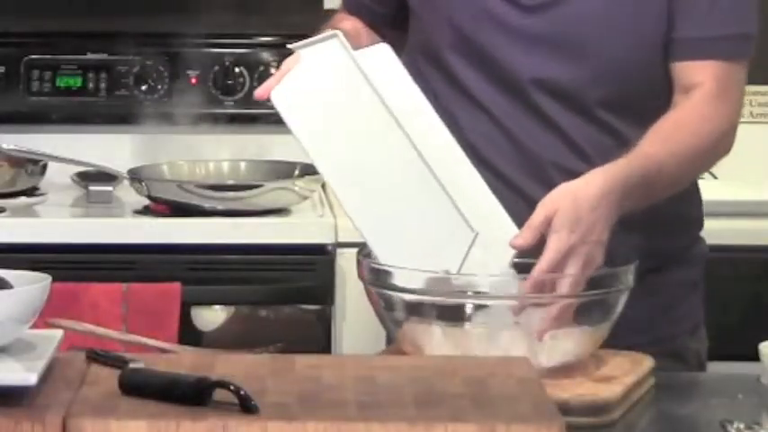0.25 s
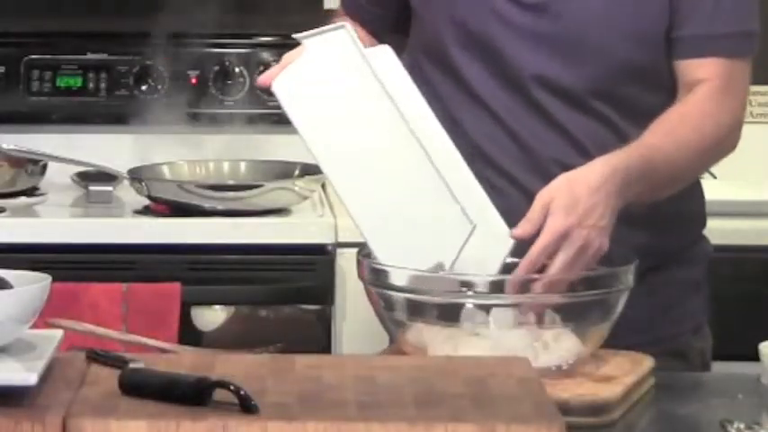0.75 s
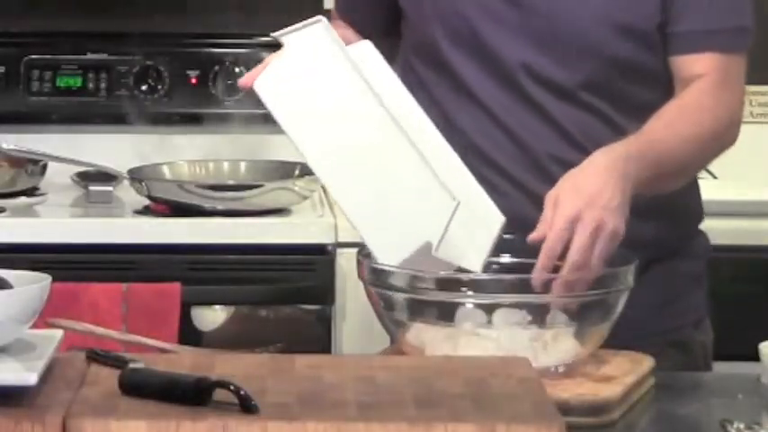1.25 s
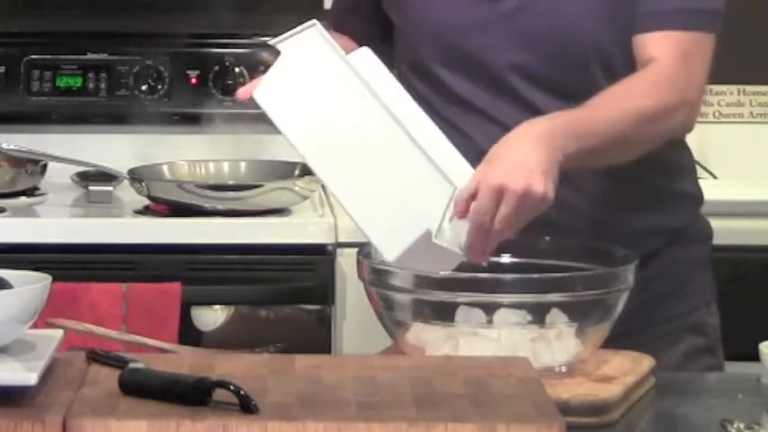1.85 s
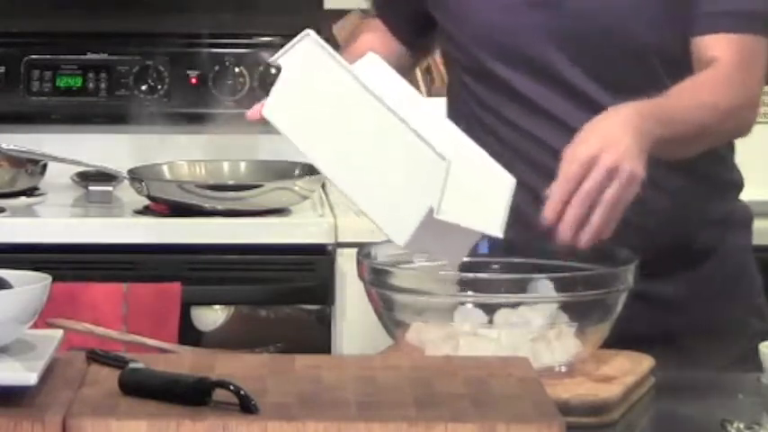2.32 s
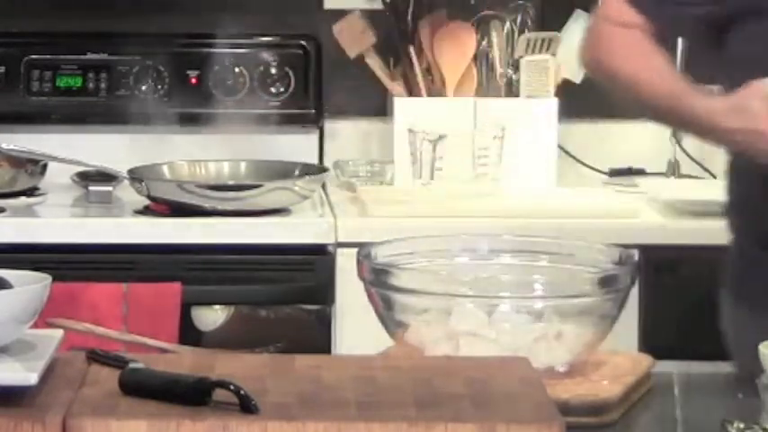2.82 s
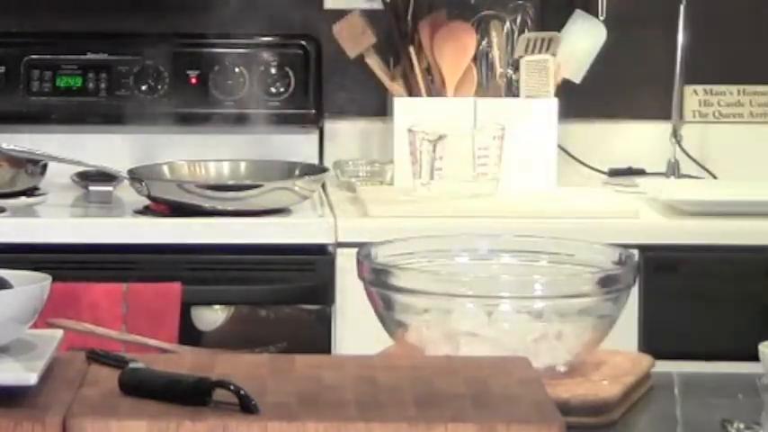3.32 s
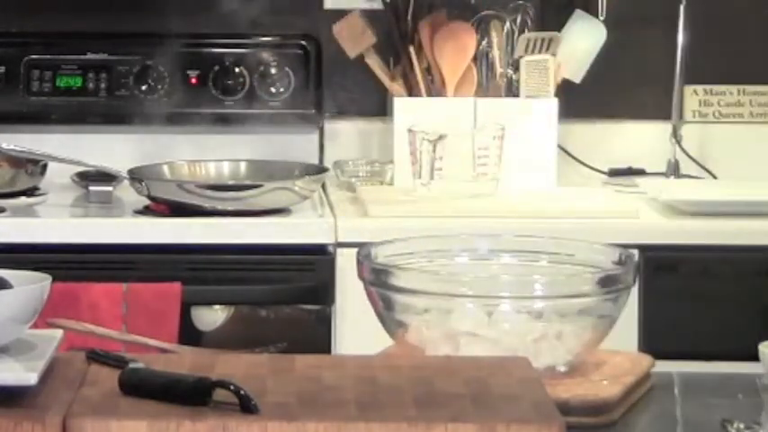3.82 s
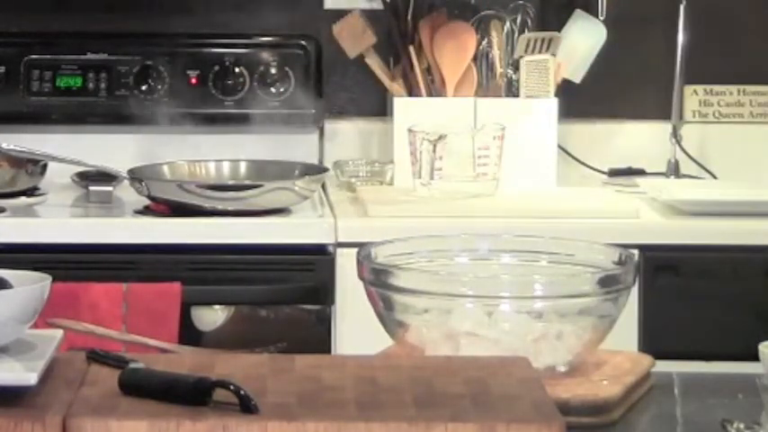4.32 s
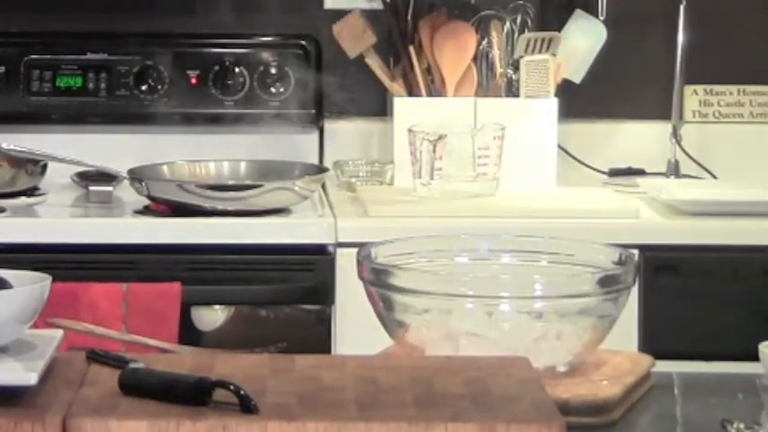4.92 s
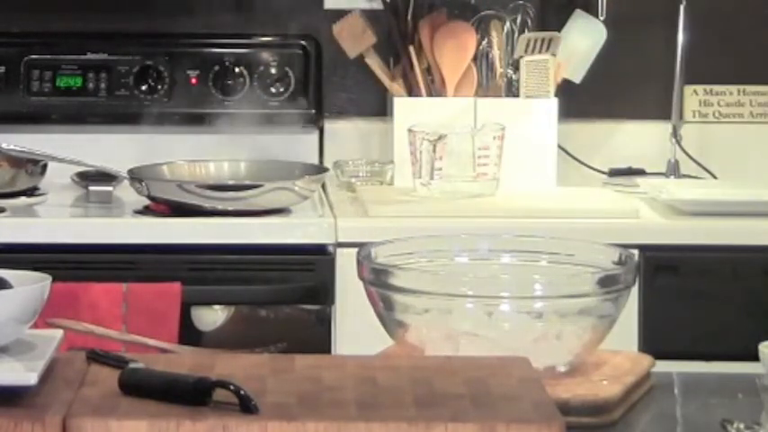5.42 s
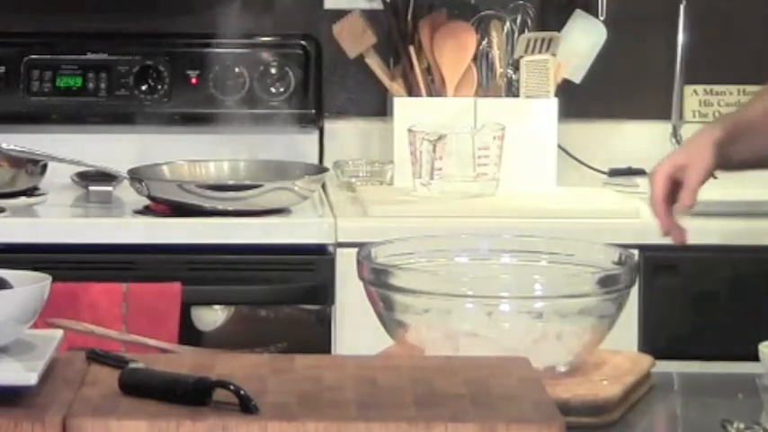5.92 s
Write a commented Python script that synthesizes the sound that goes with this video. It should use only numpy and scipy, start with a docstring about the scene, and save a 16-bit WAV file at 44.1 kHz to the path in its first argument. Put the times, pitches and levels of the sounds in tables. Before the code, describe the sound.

Ice cubes drop quickly into a glass bowl with bright, short clinks, while the remaining cubes slide and knock inside a hollow plastic bin. The knocks thin out as the bin is carried away. Then it is shoved in jerks along a shelf, scraping, groaning and thudding, before a quiet gap and one last small knock. A small hard kitchen, close stereo microphone, with steady appliance hum and faint hiss.

```python
"""In a small hard kitchen, ice cubes tumble from a plastic bin into a glass bowl, which rings in damped modes.
The cubes left slide and knock in the bin: dense random impacts filtered by its resonances.
The bin is then pushed in jerks along a shelf, which scrapes, groans at narrow pitches and thumps low.
Sparse decaying reflections return all of this except the thumps;
shaped noise gives the hum of appliances and the hiss of the microphone."""
import sys
import numpy as np
from scipy import signal
from scipy.fft import rfft, irfft
from scipy.io import wavfile
from scipy.ndimage import uniform_filter1d

SR = 44100
rng = np.random.default_rng(int(sys.argv[2]) if len(sys.argv) > 2 else 0)


def output_pcm(signal):
    """Save a mono or channel-first signal as 16-bit PCM at the path in sys.argv[1].

    Samples are clipped to [-1, 1] before scaling.
    """
    pcm = np.clip(np.atleast_2d(signal).T, -1, 1) * 32767
    wavfile.write(sys.argv[1], SR, np.round(pcm).astype(np.int16))


N = 271656


def gain_of(db):
    """Decibel law: 20 dB is a tenfold amplitude."""
    return 10 ** (np.asarray(db) / 20)


def evened(x):
    """Normalisation to unit rms."""
    return x / np.sqrt(np.mean(x ** 2) + 1e-20)


def read(points, hz):
    """Interpolation of a spectrum along logarithmic frequency."""
    f, value = np.transpose(points)
    return np.interp(np.log(hz + 1), np.log(f + 1), value)


def add(mix, s, sound):
    """Superposition of a sound on the mix from time s."""
    part = mix[round(s * SR):][:len(sound)]
    part += sound[:len(part)]


def coloured(x, db):
    """Minimum-phase filtering: the gain db on a 4096-point spectrum fixes the causal response."""
    log_gain = np.log(gain_of(np.maximum(db, -100)))
    circle = np.r_[log_gain, log_gain[-2:0:-1]]
    taps = np.fft.ifft(np.exp(np.conj(signal.hilbert(circle)))).real
    return signal.oaconvolve(x, taps)[:len(x)]


def clicks(count, per_s, spread_db):
    """Random impulse train: impacts of either sign, a few much larger than the rest."""
    size = gain_of(spread_db * np.minimum(rng.exponential(1, count), 4))
    sign = rng.choice([-1., 1.], count)
    return size * sign * (rng.random(count) < per_s / SR)


def bowl():
    """Modal synthesis: every blow ticks and rings the glass modes, each as strongly as its place allows."""
    # cubes striking the bowl: (time [s], blow [dB], hardness = upper modes and tick against the blow [dB])
    clinks = [(0.0044, -10, -32), (0.0408, -3.5, -31), (0.1114, -8, -23), (0.225, -6.5, -2),
              (0.2728, -11.5, 0), (0.2944, -24, -19), (0.3285, 1, -26), (0.3444, -24, -40),
              (0.3674, -9, -3), (0.4985, -12, -9.5), (0.5676, -16.5, -6.5)]
    # modes of the glass bowl, damped by the ice in it: (frequency [Hz], level [dB], t60 [s])
    modes = [(2003, -14, .2), (2040, -13, .2), (2108, -6, .15), (2143, 1.5, .18), (3470, -6, .16),
             (3521, -10, .18), (3568, -5, .16), (5215, -4.5, .15), (5615, -9, .1), (5850, -8, .09),
             (6045, -7, .1), (6503, -9, .07), (6708, -6, .1), (7375, -8, .07), (7615, -4, .1),
             (8419, -10, .07), (8522, -8, .09), (9125, -11, .07), (9830, -15, .06), (10600, -18, .05),
             (11670, -16, .05)]
    # cubes jostling inside the bowl: (time [s], level [dB])
    jostle_levels = [(0, -13.5), (.2, -24.5), (.3, -13.5), (.45, -28), (.6, -48), (.68, -72)]
    wander_hz = 15  # cubes shifting on the glass blur each mode by this much
    t, out = np.arange(SR // 3) / SR, np.zeros(N)
    hz, db, t60 = np.transpose(modes)[:, :, None]
    fall = gain_of(db - 60 * t / np.maximum(t60, .02))
    upper = hz > 4500
    places = rng.standard_normal((len(clinks), 2, len(modes), 1))
    ticks = rng.standard_normal((len(clinks), len(t)))
    for (s, blow_db, hard_db), (place, load), tick in zip(clinks, places, ticks):
        # a random walk of phase broadens each mode
        walk = np.cumsum(rng.standard_normal(fall.shape), axis=1)
        wander = uniform_filter1d(walk, size=64) * np.sqrt(2 * np.pi * wander_hz / SR)
        # cubes resting on the glass detune each mode a little
        detuned_hz = hz * (1 + 0.003 * load)
        rings = fall * np.sin(2 * np.pi * detuned_hz * t + 3 * place + wander)
        strengths = gain_of(upper * hard_db + 1.8 * place)
        ring = (strengths * rings).sum(0) * np.minimum(t / .004, 1)
        tick = np.diff(uniform_filter1d(tick, size=6), prepend=0)
        tick = tick * np.exp(-t / 0.012) * np.minimum(t / .003, 1) * gain_of(hard_db - 10)
        add(out, s, gain_of(blow_db) * (ring + tick))
    level = gain_of(np.interp(np.arange(SR) / SR, *np.transpose(jostle_levels)))
    rings = fall * gain_of(-3.5 * upper) * np.sin(2 * np.pi * hz * t)
    jostle = sum(signal.oaconvolve(clicks(SR, 450, 1.8), ring)[:SR] for ring in rings)
    # ice on ice, between the modes
    grit = signal.lfilter(*signal.iirpeak(5000, .9, fs=SR), clicks(SR, 5000, 2.5))
    add(out, 0, level * (evened(jostle) + gain_of(-17) * evened(grit)))
    return out


def knocks():
    """Impact excitation: brief contacts ring a hollow tone and a broad crack at its own, usually higher, pitch."""
    # single knocks of cube, bin and shelf: (time [s], blow [dB], pitch [Hz],
    # hollowness = pitch / width [ratio], crack pitch [Hz], crack against the blow [dB])
    blows = [(0.641, -11, 990, 1.6, 2200, -3), (0.883, -14.5, 3370, 0.89, 1210, -6),
             (0.983, -14.5, 776, 3.4, 2600, -14), (1.046, -8, 1200, 0.45, 6200, -19),
             (1.172, -22, 755, 3.4, 5640, 2.5), (1.21, -15, 695, 3.5, 3160, -4.5),
             (1.36, -18, 1880, 1.7, 3460, -6), (1.438, -16.5, 610, 1.6, 2800, -12),
             (1.518, -14, 856, 4.5, 2900, -5), (1.538, -3.5, 1310, 0.71, 4700, -30),
             (1.624, -16, 790, 2.7, 2480, -1.5), (1.689, -14, 764, 0.41, 2410, -4.5),
             (1.819, -20, 437, 2.3, 2560, -8), (1.892, -16, 890, 0.79, 3370, -30),
             (2.054, -19, 500, 0.52, 2500, -18), (2.174, -21, 715, 1.35, 1950, 2.5),
             (2.184, -22, 510, 3, 1600, -8), (2.279, -12.5, 1580, 2.7, 2640, -4),
             (2.286, -15.5, 675, 1.6, 1520, -23), (2.428, -13, 1790, 4.3, 3700, -3.5),
             (2.449, -38, 1720, 3.5, 3870, -22), (2.501, -17.5, 3700, 2.2, 3080, -1),
             (2.511, -14.5, 3400, 4.7, 5300, -22), (2.522, -31, 3430, 4.7, 2800, -21),
             (2.671, -29.5, 1720, 3, 3350, 0), (2.846, -22, 723, 6.8, 1990, -1),
             (2.883, -10.5, 766, 2.4, 2100, -6), (3.11, -36, 513, 17, 2840, -6.5),
             (3.448, -19.5, 1000, 2.5, 1420, -3), (3.454, -20.5, 1030, 2.1, 1490, -5),
             (3.491, -14.5, 402, 1.45, 1500, -6), (3.497, -17, 3770, 4.5, 1480, 2),
             (3.628, -8.5, 803, 3.6, 2630, -10.5), (3.674, -14.5, 840, 3.2, 1400, 0),
             (3.756, -5.5, 774, 0.78, 2030, -10), (3.782, -8.5, 670, 6.2, 2680, -5),
             (3.791, -8.5, 680, 2.8, 1880, -2), (3.878, -8.5, 700, 3.2, 1500, -3),
             (3.983, -6, 690, 2.3, 1740, 0.5), (4.035, -11.5, 680, 1.4, 1690, -2.5),
             (4.075, -8.5, 732, 5.7, 2320, -3.5), (4.131, -21, 764, 2.5, 1900, 7),
             (4.331, -6.5, 684, 1.5, 3020, -4.5), (4.54, -17, 970, 0.52, 3300, 7.5),
             (4.714, -14, 830, 3.4, 2510, 5.5), (4.888, -7.5, 660, 0.41, 2670, -23),
             (5.072, -9.5, 1180, 5, 2920, -3.5), (5.151, -6, 740, 0.92, 2600, -11),
             (6.004, -24.5, 1100, 2, 2670, 2.5), (6.067, -21, 1000, 1.8, 1580, -5),
             (6.113, -22, 2760, 1.7, 3380, -13), (6.117, -9, 3000, 2.6, 2470, -4),
             (6.127, -22, 2200, 2.4, 3230, -13)]
    rise_s = .0017  # a cube lands edge first, so the blow builds up
    decay_s = 0.0041  # time constant of the contacts
    out, t = np.zeros(N), np.arange(4000) / SR
    noise = rng.standard_normal((len(blows), 2, len(t)))
    noise[:, 0, round(rise_s * SR)] = 2.7  # the hardest contact
    for (s, blow_db, hz, hollow, crack_hz, crack_db), contacts in zip(blows, noise):
        slow = t / [[1], [2]]  # the chips behind the crack spread over twice the time
        struck, chips = contacts * np.exp(-slow / decay_s) * np.minimum(slow / rise_s, 1)
        cavity = signal.iirpeak(hz, np.clip(hollow, .5, 12), fs=SR)
        edge = signal.iirpeak(crack_hz, 1.3, fs=SR)
        tone = signal.lfilter(*cavity, signal.lfilter(*cavity, struck))
        crack = signal.lfilter(*edge, signal.lfilter(*edge, chips))
        knock = tone / abs(tone).max() + gain_of(crack_db) * crack / abs(crack).max()
        add(out, s - rise_s, gain_of(blow_db) * knock)
    return out


def impacts(per_s, spread_db, cycles, ring_db):
    """Granular excitation: each bump gives a short scratch and a brief tone at one of 24 pitches."""
    out, t = np.zeros(N), np.arange(2048) / SR
    scratches = rng.standard_normal((24, len(t))) * np.exp(-t / .003)
    pitches = np.geomspace(300, 5500, num=24) * rng.uniform(0.92, 1.047, 24)
    for hz, scratch in zip(pitches, scratches):
        # the tone falls to 1/e in the given number of cycles
        tone = gain_of(ring_db) * hz / SR * np.sin(2 * np.pi * hz * t) * np.exp(-t * hz / cycles)
        grain = tone + scratch / np.linalg.norm(scratch) / 24
        out += signal.oaconvolve(clicks(N, per_s / 24, spread_db), grain)[:N]
    return out


def lumps(per_s, depth_db):
    """Stick-slip modulation: a gain that jumps about as friction grips and lets go."""
    return gain_of(depth_db * evened(uniform_filter1d(rng.standard_normal(N), round(SR / per_s))))


def rattle(body, modes, drive):
    """Source-filter principle: dense impacts excite a body; gives middle, bass and treble, each of rms 1."""
    hz = np.fft.rfftfreq(4096, 1 / SR)
    resonances_db = sum(db / (1 + (2 * (hz - f) / width) ** 2) for f, width, db in modes)
    colour_db = read(body, hz) + resonances_db
    under_low, under_high = 1 / (1 + (hz / 300) ** 6), 1 / (1 + (hz / 2500) ** 6)
    middle = under_high - under_low
    bass = under_low / (1 + (125 / (hz + 1)) ** 8)
    treble = 1 - under_high
    # the body spectrum is that of the whole rattle, so the slope of the impacts is taken out
    drive_power = signal.welch(drive, nperseg=4096)[1]
    colour_db -= 10 * np.log10(uniform_filter1d(drive_power, size=41))
    colour_db -= colour_db.max()
    shares = middle, bass, treble
    return [evened(coloured(drive, colour_db + 10 * np.log10(share + 1e-9))) for share in shares]


def in_hand(middle, bass, grit):
    """Amplitude envelopes by band: cubes left in the bin rattle as it is tipped and carried off."""
    # cubes sliding and rattling in the hand-held bin: (time [s], level [dB])
    levels = [(0, -10), (.1, -14.5), (.2, -21), (.3, -26), (.62, -25), (.93, -24.5), (1.03, -17.5),
              (1.2, -18.5), (1.29, -28.5), (1.43, -26), (1.5, -15.5), (1.545, -9.5), (1.68, -19),
              (1.8, -30.5), (2.1, -34), (2.4, -52), (2.7, -44), (2.82, -35), (2.89, -16.5), (2.97, -38.5),
              (3.25, -48)]
    # bass of the rattle: (time [s], level [dB])
    bass_levels = [(0, -33.5), (.25, -44), (.65, -43), (.95, -47), (1.1, -73), (1.43, -41), (1.7, -32.5),
                   (2, -77), (2.9, -57.5), (3.25, -66)]
    # treble of the rattle: (time [s], level against the middle [dB])
    grit_levels = [(0, -7), (.3, 6), (.6, 1), (.7, -5.5), (1.2, -3.5), (1.7, -10.5), (2.6, 1.5), (2.9, -10),
                   (3.25, 2)]
    t = np.arange(N) / SR
    level = gain_of(np.interp(t, *np.transpose(levels), right=-120))
    weight = gain_of(np.interp(t, *np.transpose(bass_levels), right=-120))
    grit_share = gain_of(np.interp(t, *np.transpose(grit_levels)))
    return level * (middle + grit_share * grit) + weight * bass


def jerks(rows, middle, bass, grit):
    """Incoherent power addition: each jerk catches, sags or swells, then dies; overlapping powers add."""
    grab_s, release_db_per_s = 0.0039, 153  # it catches quickly and dies when the motion stops
    t, power = np.arange(SR) / SR, np.zeros((3, N))
    for s, level_db, length, sag_db_per_s, weight_db, grit_db in rows:
        sag_db = sag_db_per_s * np.minimum(t, length)
        release_db = release_db_per_s * np.maximum(t - length, 0)
        jerk = np.minimum(t / grab_s, 1) * gain_of(level_db - sag_db - release_db)
        for band, share_db in zip(power, (0, weight_db, grit_db)):
            add(band, s, (gain_of(share_db) * jerk) ** 2)
    return (np.sqrt(power) * [middle, bass, grit]).sum(0)


def groans():
    """Narrow-band resonance: uneven slips ring one tone that fades in and out."""
    # the shelf groaning under the longer jerks: (start [s], length [s], level [dB], pitch [Hz])
    rows = [(3.769, 0.23, -31, 346), (4.0, 0.14, -27, 482), (4.558, 0.051, -25, 306),
            (5.1, 0.185, -25, 453), (5.157, 0.11, -22.5, 322)]
    width_hz, fade_s = 30, 0.02
    out, t = np.zeros(N), np.arange(SR // 2) / SR
    for (s, length, db, hz), noise in zip(rows, rng.standard_normal((len(rows), len(t)))):
        tone = evened(signal.lfilter(*signal.iirpeak(hz, hz / width_hz, fs=SR), noise))
        fade = np.clip(np.minimum(t, length + fade_s - t) / fade_s, 0, 1)
        add(out, s, gain_of(db) * fade * tone)
    return out


def brushes():
    """Band-passed random grains: a short swell of grainy hiss around one broad pitch."""
    # soft bright brushes as the bin is handled: (time [s], level [dB], pitch [Hz])
    rows = [(1.332, -40.5, 8500), (1.46, -35.5, 8000), (1.533, -27, 9200), (1.794, -42, 7500),
            (2.808, -30.5, 7600), (3.13, -33.5, 7660)]
    rise_s, fall_s = 0.007, 0.034  # linear rise; time constant of the fall
    out, t = np.zeros(N), np.arange(SR // 4) / SR
    for (s, db, hz), noise in zip(rows, rng.standard_normal((len(rows), len(t)))):
        band = signal.iirpeak(hz, 1.4, fs=SR)
        grains = noise * clicks(len(t), 4800, 1.7)
        hiss = evened(signal.lfilter(*band, signal.lfilter(*band, grains)))
        swell = np.minimum(t / rise_s, 1) * np.exp(-t / fall_s)
        add(out, s, gain_of(db) * swell * hiss)
    return out


def thumps():
    """Damped oscillation: each jolt rings one low tone that dies exponentially."""
    # low booms under the heavier jolts: (time [s], level [dB], pitch [Hz])
    rows = [(1.017, -34, 142), (1.212, -31, 146), (1.689, -37, 143.5), (1.77, -30, 143),
            (3.491, -32, 162.4), (4.324, -18, 152.3), (4.532, -16, 157.7), (4.598, -16.5, 156.3),
            (4.85, -30, 158.6), (5.072, -28, 148), (6.112, -31, 61.6)]
    rise_s, t60_s = 0.011, 0.49
    out, t = np.zeros(N), np.arange(SR // 2) / SR
    for s, db, hz in rows:
        envelope = np.minimum(t / rise_s, 1) * gain_of(db - 60 * t / t60_s)
        add(out, s, envelope * np.sin(2 * np.pi * hz * t))
    return out


def kitchen(x, apart_db):
    """Reverberation: sparse reflections of random sign die by band, nearly alike at two close microphones."""
    # decay of the room: (frequency [Hz], t60 [s])
    decay = [(150, 0.34), (400, 0.67), (1000, 0.46), (2800, 0.4), (7300, 0.39), (13000, 0.42)]
    # three sets of reflections take turns, so no fixed comb colours the room
    out, turn = np.zeros((2, N)), 2 * np.pi * 0.8966 * np.arange(N) / SR
    for k in range(3):
        taps = np.zeros((2, SR))
        # one reflection at a random place in every 20 samples
        at = np.arange(200, SR - 20, 20) + rng.integers(0, 20, (2, (SR - 201) // 20))
        np.put_along_axis(taps, at, rng.choice([-1., 1.], at.shape), 1)
        hz, t, z = signal.stft(taps, SR, nperseg=256)
        z[1] *= gain_of(apart_db + 1.8 * np.log2(hz / 1000 + 0.067))[:, None]
        fall = gain_of(-60 * t / read(decay, hz)[:, None])
        mid, side = signal.istft(z * fall, SR, nperseg=256)[1]
        tail = np.array([mid + side, mid - side]) / np.linalg.norm(mid)
        share = np.sqrt(2 / 3) * np.cos(turn + 2 * np.pi * k / 3)  # the three powers sum to one
        out += signal.fftconvolve((share * x)[None], tail, axes=1)[:, :N]
    return out


def hum():
    """Spectral shaping of partly coherent noise: steady, alike in both channels in the bass, fluttering a little."""
    # spectrum of the appliances and hiss: (frequency [Hz], relative level per Hz [dB])
    spectrum = [(25, -42), (49, -18), (69, -5.5), (118, -20), (167, 0.5), (201, -12), (249, 0), (372, -8.5),
                (410, -6), (950, -11.5), (1340, -15.5), (14900, -38.5)]
    # left-right likeness: (frequency [Hz], correlation [0 to 1])
    likeness = [(60, 1), (240, 0.94), (930, 0.83), (3660, 0.92), (14400, 0.86)]
    frames, hz = N // 512 + 5, np.fft.rfftfreq(2048, 1 / SR)
    a, b, c, d, patches = rng.standard_normal((frames, 1025, 5)).T
    patches = uniform_filter1d(patches, size=16, axis=0)
    patches = evened(uniform_filter1d(patches, size=8, axis=1))
    same = np.clip(read(likeness, hz), -1, 1)[:, None]
    left = a + 1j * b
    right = same * left + np.sqrt(1 - same ** 2) * (c + 1j * d)
    z = np.array([left, right]) * gain_of(read(spectrum, hz)[:, None] + 1.3 * patches)
    return gain_of(-41.5) * evened(signal.istft(z, nperseg=2048, noverlap=1536)[1][:, :N])


def scene():
    """Direct and reflected sound superpose: hits arrive mostly by the walls; the middle register leans left."""
    # spectra of the rattling bin and the scraped shelf: (frequency [Hz], relative level per Hz [dB])
    bin_body = [(80, -21), (135, -17), (192, -2), (431, 2.5), (777, -5), (1030, -16), (1340, 10.5),
                (8790, -30.5), (11200, -37), (14900, -46)]
    shelf_body = [(80, -22.5), (151, -16.5), (205, -11), (362, -1), (585, -9.5), (697, -1.5), (3290, -14),
                  (6060, -33), (8060, -29), (13300, -46), (14900, -28.5)]
    # resonances of each: (frequency [Hz], width [Hz], level [dB])
    bin_modes = [(131, 26, 15.5), (632, 22, 3), (949, 480, 18.5), (1405, 390, -8), (3660, 400, 3)]
    shelf_modes = [(155.4, 17, 8.5), (368, 8.3, 2.5), (480.5, 27, 5.5), (630, 33, 3.5)]
    # last cubes slipping in the bin, then jerks along the shelf: (start [s], level [dB], length [s],
    # sag [dB/s], bass against the level [dB], treble against the level [dB])
    slips = [(2.168, -28, 0.018, 65, -26, -30), (2.274, -30, 0.02, 130, -25, -19),
             (2.425, -27.5, 0.021, 24.8, -49, -1.5), (2.498, -29, 0.022, 77, -38, -1.5)]
    shoves = [(3.276, -38, 0.11, -8, 3.5, -9), (3.483, -16, 0.016, 100, 1.5, -10.5),
              (3.624, -21, 0.11, -72, -14, -10), (3.772, -7.5, 0.017, 102, -39, -11.5),
              (3.826, -12, 0.17, 33, -43, -7.5), (3.971, -15, 0.43, 40.5, -8, -8),
              (4.322, -10.5, 0.175, 85, -4.5, -7), (4.45, -21, 0.043, -31, -5, -13.5),
              (4.52, -8.5, 0.095, 19, -3, -8.5), (4.636, -11, 0.47, 27, -9.5, -8),
              (5.061, -10.5, 0.18, -2, -8, -9), (6.116, -20, .05, 100, -1.5, -8)]
    # lean to the left: (frequency [Hz], left minus right [dB])
    left_lean = [(60, 0), (150, -.6), (300, -.8), (500, 1.1), (1000, 1.7), (2300, 1.6), (4500, .2),
                 (12000, 0)]
    glass, hits = gain_of(-6.5) * bowl(), gain_of(1.5) * knocks()
    cubes = rattle(bin_body, bin_modes, impacts(3200, 3.8, cycles=2.6, ring_db=-9.5))
    friction = impacts(2300, 1.4, cycles=3.2, ring_db=-10.0) * lumps(per_s=80, depth_db=1.8)
    scrape = rattle(shelf_body, shelf_modes, friction)
    sliding = in_hand(*cubes) + jerks(slips, *cubes) + jerks(shoves, *scrape) + brushes() + groans()
    direct = glass + hits + gain_of(-3.0) * sliding
    walls = gain_of(-3.0) * glass + gain_of(2.2) * hits + gain_of(-4.5) * sliding
    near = direct + thumps() + kitchen(walls, apart_db=-16.0)
    lean_db = read(left_lean, np.fft.rfftfreq(N, 1 / SR)) / 2
    return irfft(rfft(near) * gain_of([lean_db, -lean_db]), N) + hum()


def record(dry):
    """Transducer limits: the treble rolls off, the loudest blows saturate softly, then the band is cut."""
    # response of the microphone: (frequency [Hz], gain [dB])
    response = [(100, -0.5), (12000, -2), (13500, -7), (15000, -31)]
    edge_hz = 15000
    colour_db = read(response, np.fft.rfftfreq(4096, 1 / SR))
    heard = np.array([coloured(channel, colour_db) for channel in dry])
    held = np.tanh(heard / 1.251) * 1.354
    band_limit = signal.firwin(511, edge_hz, window=("kaiser", 9), fs=SR)
    return signal.oaconvolve(held, band_limit[None], "same")


dry = scene()
out = record(dry)
output_pcm(out)
```